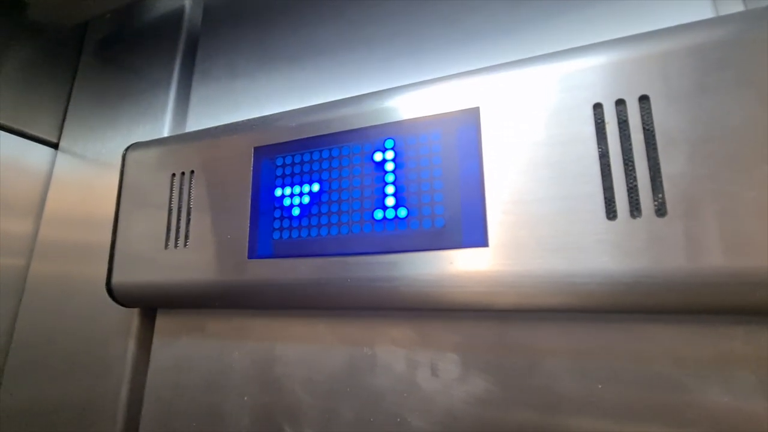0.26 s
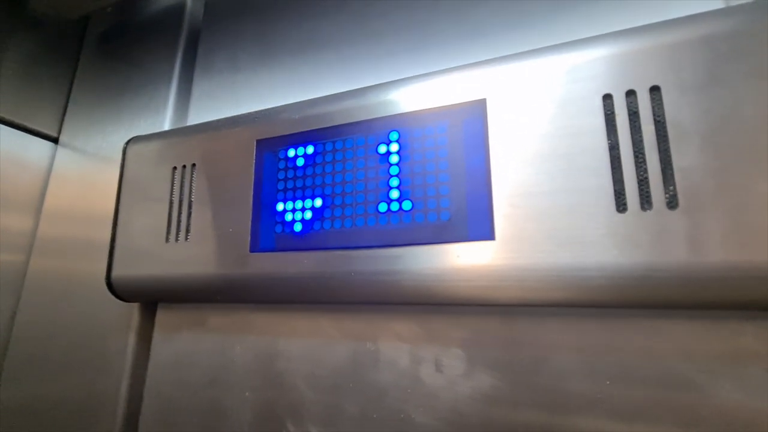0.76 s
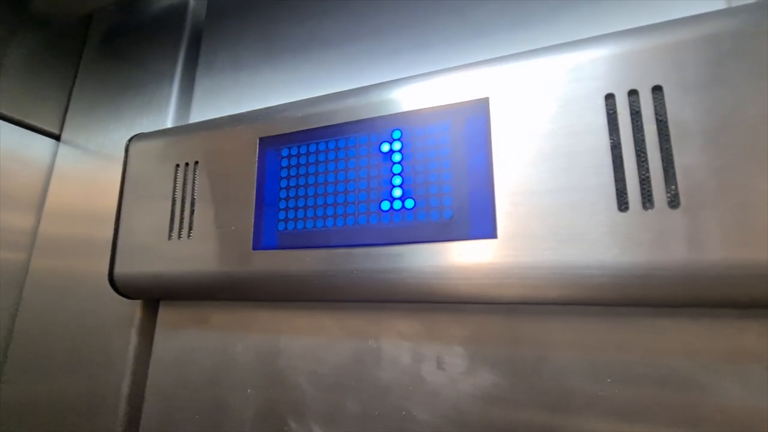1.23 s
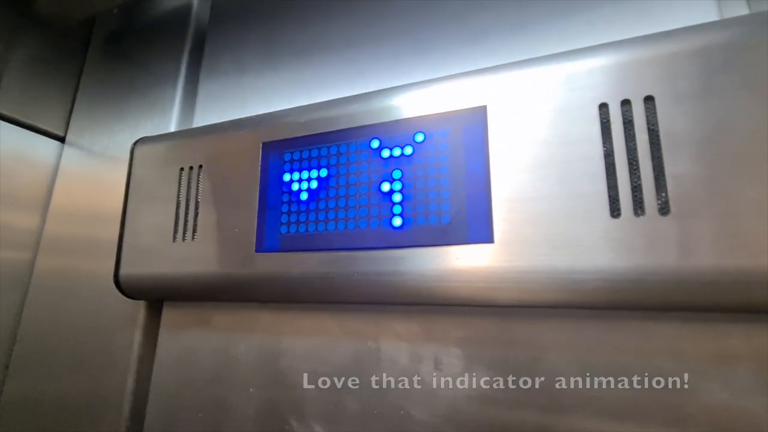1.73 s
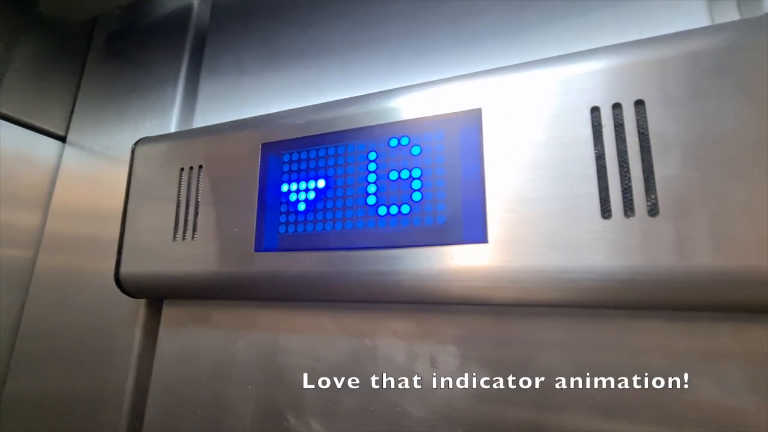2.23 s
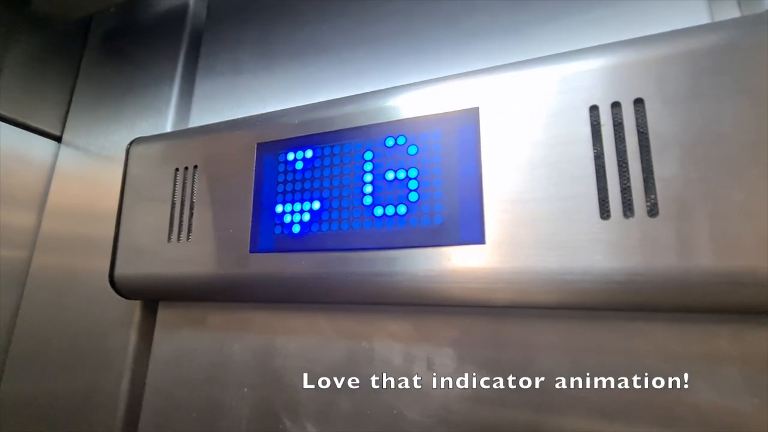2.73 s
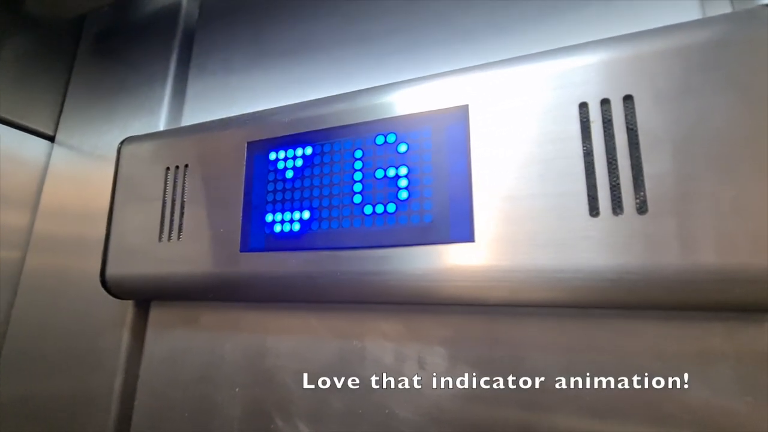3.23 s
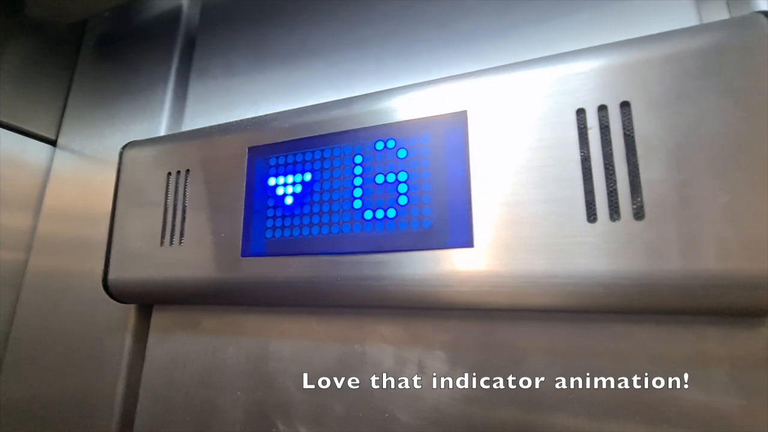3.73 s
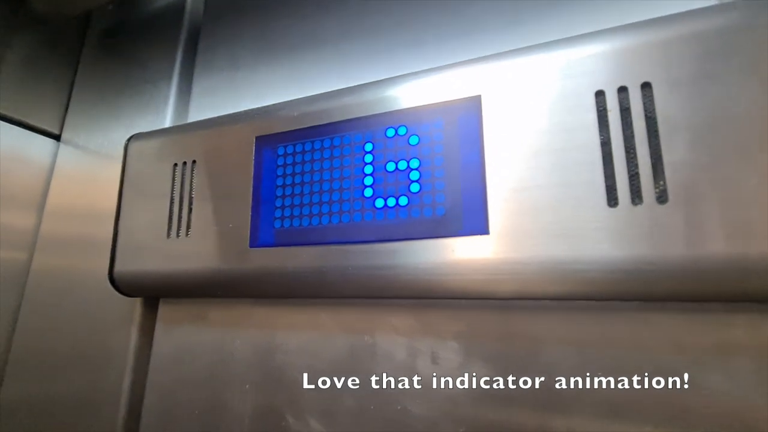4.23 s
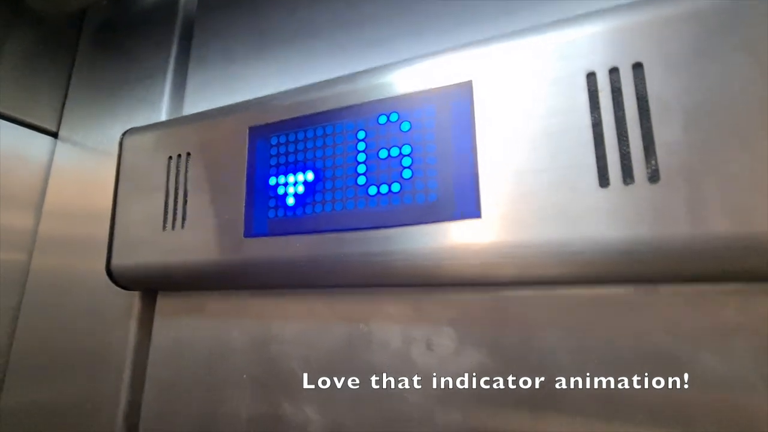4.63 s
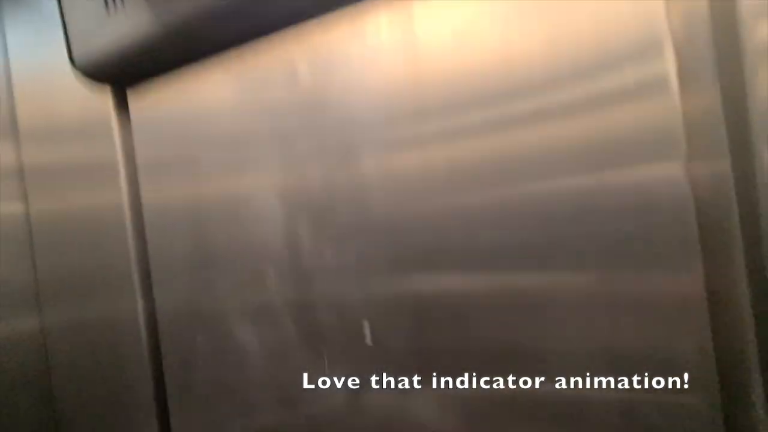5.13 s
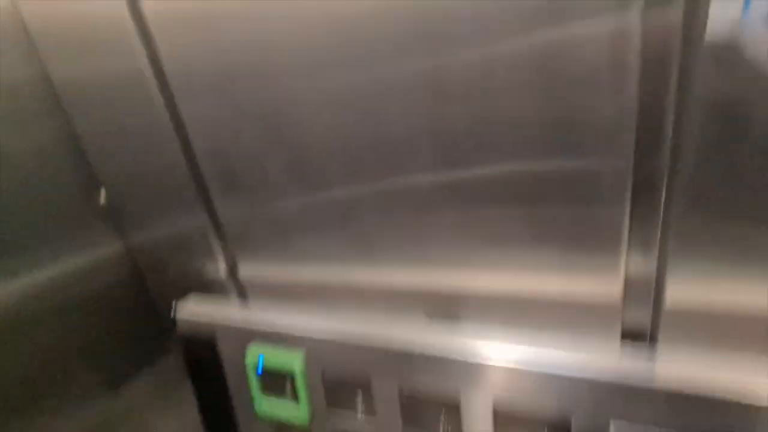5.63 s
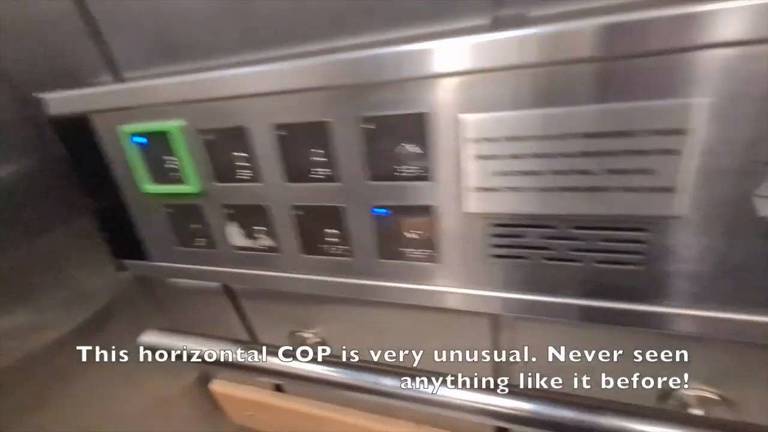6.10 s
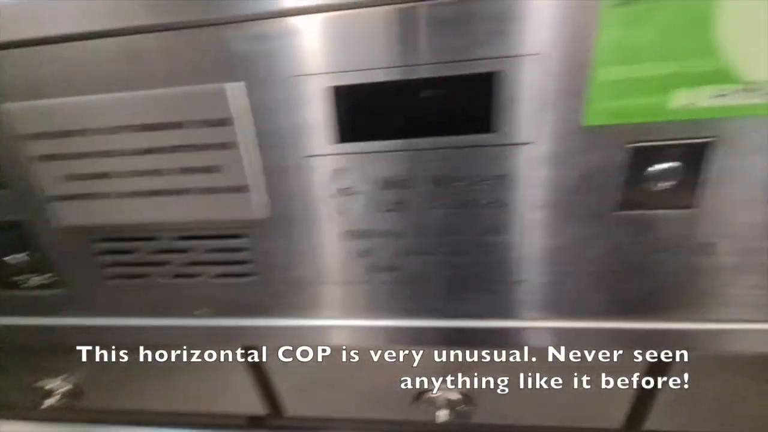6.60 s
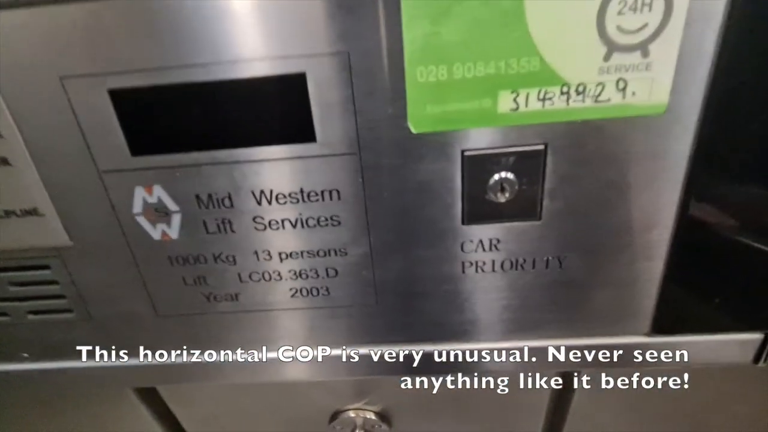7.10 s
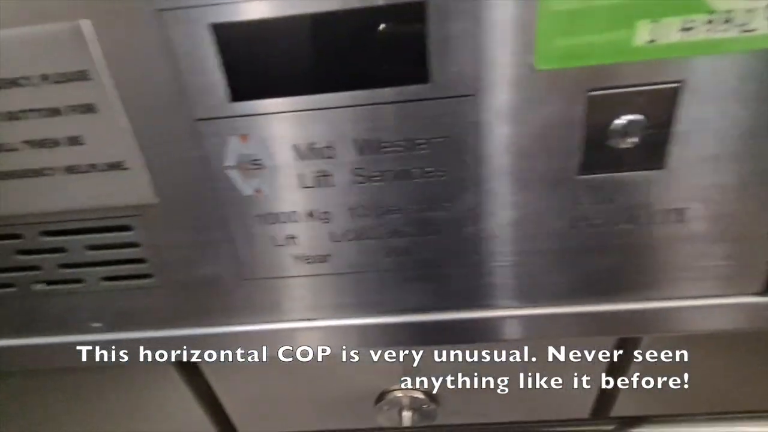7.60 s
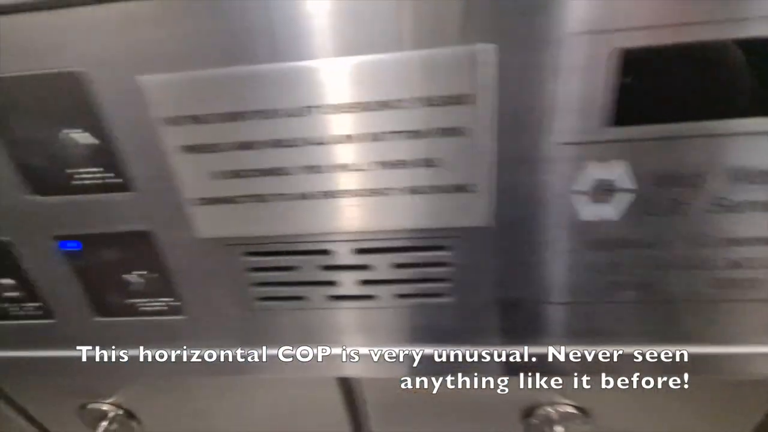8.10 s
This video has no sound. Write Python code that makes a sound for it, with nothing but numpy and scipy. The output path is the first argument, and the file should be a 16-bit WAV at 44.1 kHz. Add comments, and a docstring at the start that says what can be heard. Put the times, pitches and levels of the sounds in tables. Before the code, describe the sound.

Inside a small steel lift going down, a low boomy hum and dull rumble with hollow knocks, small ticks, and later a burst of cloth rustle.

```python
"""Inside a steel lift car going down: noise shaped by the car's air modes makes a dull rumble,
and a narrow low hum with swelling sine waves makes the boom. Guide shoes and panels knock as
rattling noise that rings the small box; fittings tick as short bursts of filtered noise.
Wavering near sines squeal and moan, and cloth rustles as hiss close to a two-port
microphone as the rider turns."""
import sys
import numpy as np
from scipy import signal
from scipy.fft import rfft, irfft
from scipy.io import wavfile
from scipy.ndimage import uniform_filter1d

SR = 44100
rng = np.random.default_rng(int(sys.argv[2]) if len(sys.argv) > 2 else 0)


def store_wav(level_fs):
    """Save 16-bit WAV to argv[1]."""
    pcm = np.round(np.clip(np.atleast_2d(level_fs), -1, 1) * 32767)
    wavfile.write(sys.argv[1], SR, pcm.T.astype(np.int16))


def ratio_of_db(decibels):
    """Turn decibels (scalar or array-like) into linear amplitude factors; 0 dB maps to 1."""
    return 10 ** (np.asarray(decibels, float) / 20)


N = 368215  # length [samples]

# air and panel modes of the car: (pitch [Hz], relative level [dB], time to fall 60 dB [s])
CAR_MODES = [(117, 3, 0.5), (139.6, 0.5, 0.5), (190.9, -4.5, 0.34), (256, 1, 0.36), (315, -1.5, 0.22),
             (369, -2, 0.27), (435, 0.5, 0.18), (495, -9, 0.18), (590, -14, 0.16), (675, -9, 0.15),
             (855, -11, 0.12), (955, -15, 0.12), (1050, -17, 0.09), (1145, -9, 0.09), (1350, -13, 0.08),
             (1505, -20, 0.1), (1650, -20, 0.09), (1845, -16, 0.1), (2070, -20, 0.08), (2340, -24, 0.07),
             (2800, -28, 0.08), (3300, -33, 0.07), (5600, -35, 0.1), (7300, -47, 0.08)]
# how long dense reflections last: (frequency [Hz], time to fall 60 dB [s])
REFLECTION_TIMES = [(100, 0.65), (260, 0.22), (700, 0.29), (1840, 0.13), (4850, 0.18)]
# knocks: (time [s], body [dB], hollow [dB], clack [dB], snap [dB], fizz [dB], rattle time [s])
KNOCK_EVENTS = [(0.004, -32, -33, -41, -57.5, -68.5, 0.0078), (0.427, -33, -33.5, -40.5, -57.5, -66, 0.01),
                (0.595, -44.5, -38, -49.5, -80, -93.5, 0.035),
                (1.065, -34.5, -33.5, -40, -55.5, -66.5, 0.012),
                (1.255, -59, -57, -53.5, -67.5, -81.5, 0.017), (1.533, -49, -54.5, -98, -102, -110, 0.017),
                (1.82, -44.5, -54.5, -78.5, -95, -105, 0.025), (2.0, -48.5, -47, -46, -57.5, -72, 0.04),
                (3.266, -43.5, -52, -52, -84, -105, 0.019), (3.611, -40, -52, -49, -77.5, -105, 0.013),
                (4.135, -35.5, -32, -39.5, -63, -72.5, 0.014), (5.561, -50, -46, -67, -63, -85, 0.027),
                (5.703, -33.5, -41, -40, -65, -77.5, 0.015), (6.098, -32, -31, -33, -50.5, -73.5, 0.0094),
                (6.356, -36, -37.5, -42.5, -66, -73.5, 0.013),
                (6.566, -33.5, -44, -42.5, -72, -89.5, 0.014), (6.702, -37, -37.5, -45, -76, -96, 0.021),
                (7.285, -35.5, -34.5, -39.5, -61, -90.5, 0.018),
                (7.411, -29.5, -34, -56.5, -65.5, -85, 0.016)]
# colour of the reflections of a blow: (frequency [Hz], relative level [dB per Hz])
REFLECTION_COLOUR = [(40, -39), (100, -8.5), (250, -3), (450, -13.5), (1000, -19.5), (1900, -21.5),
                     (3300, -34.5), (4600, -41.5), (7000, -44), (8600, -49.5), (15500, -49)]
# bands of a knock from thud to fizz: (low edge [Hz], high edge [Hz])
THUD_TO_FIZZ = [(100, 200), (200, 400), (400, 800), (900, 4600), (4700, 8000), (8000, 15000)]
# colour of the rumble without the car modes: (frequency [Hz], relative level [dB per Hz])
RUMBLE_COLOUR = [(12, -40), (20, -30), (65, -2), (88, -6), (187, -22.5), (713, -33.5), (916, -43.5),
                 (1690, -43.5), (3500, -61.5), (7230, -66), (8550, -93.5), (11800, -81.5), (15800, -67)]
# steady sounds of the ride: (time [s], rumble [dB], shaft drone [dB], hum [dB])
RIDE_LEVELS = [(0.0, -55, -50, -45.5), (0.7, -54.5, -49, -45), (1.6, -52, -44.5, -36),
               (2.2, -52, -51.5, -41.5), (3.1, -55, -48.5, -39), (3.7, -53.5, -52.5, -44),
               (5.1, -55, -50.5, -45), (6.4, -52, -46.5, -45), (7.05, -51, -53, -53.5),
               (7.35, -46, -48, -55), (7.47, -45, -41, -49), (7.88, -52, -51.5, -53), (8.35, -52, -55, -64)]
# swells of the boom: (peak time [s], peak level [dB], pitch [Hz], length [s])
BOOM_SWELLS = [(0.03, -26.5, 81.6, 0.078), (0.296, -33, 78.8, 0.089), (0.456, -27.5, 80.3, 0.13),
               (0.657, -24.5, 70, 0.21), (0.973, -33, 82.6, 0.23), (1.107, -25.5, 81.6, 0.032),
               (1.378, -34.5, 77.92, 0.21), (1.601, -25, 79.7, 0.08), (1.87, -33, 81.12, 0.18),
               (2.07, -30, 81, 0.16), (2.372, -37.5, 80, 0.2), (2.577, -30.5, 79.8, 0.15),
               (2.895, -32, 83.9, 0.16), (3.47, -34, 83.3, 0.36), (3.825, -32, 82, 0.072),
               (4.174, -29.5, 80.56, 0.15), (4.451, -34.5, 78.7, 0.14), (4.86, -37.5, 80.2, 0.12),
               (5.13, -36, 79.5, 0.27), (5.616, -30, 78, 0.22), (6.12, -38, 78.3, 0.071),
               (6.62, -37.5, 81.66, 0.22), (7.453, -30, 97.5, 0.091), (7.49, -35, 60, 0.04),
               (8.243, -36, 77.2, 0.095)]
# light taps of fittings, and two rows at 2.0 s where the knock rings on: (time [s], level [dB], centre [Hz],
# width [Hz], time to fall 60 dB [s])
TICKS = [(0.296, -54, 915, 800, 0.09), (2.005, -46.5, 2260, 1990, 0.26),
         (2.001, -58, 6440, 600, 0.37), (3.271, -74, 5500, 151, 0.12),
         (3.615, -68, 5500, 150, 0.16), (3.925, -73, 5600, 200, 0.17),
         (4.808, -55, 1660, 1500, 0.17), (5.067, -52, 2180, 700, 0.05),
         (5.139, -50.5, 1330, 900, 0.099), (5.24, -56, 950, 596, 0.99),
         (5.544, -51.5, 1880, 900, 0.11), (6.786, -65.5, 6500, 4000, 0.1),
         (7.105, -52.5, 1200, 1850, 0.2), (7.569, -49, 6870, 2500, 0.043),
         (8.301, -52.5, 6250, 3070, 0.4)]
# thin squeals, one list each: (time [s], pitch [Hz], level [dB])
SQUEAL_CURVES = [
    [(1.86, 7400, -81), (1.96, 7930, -79), (1.985, 7960, -68)],
    [(3.93, 8450, -94), (4.005, 8480, -72), (4.06, 8050, -78), (4.2, 8000, -75), (4.3, 7850, -83),
     (4.38, 7700, -85)],
]
# moans of a panel, one list each: (time [s], pitch [Hz], level [dB])
MOAN_CURVES = [
    [(3.92, 415, -61), (3.95, 440, -57.5), (4.05, 442, -55)],
    [(5.05, 432, -61), (5.134, 427, -56), (5.4, 422, -61)],
]
# colour of rubbing cloth: (frequency [Hz], relative level [dB per Hz])
CLOTH_COLOUR = [(300, -25.5), (600, 2.5), (1400, 2), (2800, 0.5), (5200, -4.5), (6800, 0.5), (7800, -3),
                (8500, -10), (12000, -6), (15800, -6)]
# how strongly the cloth rubs: (time [s], level [dB])
RUB_LEVELS = [(4.35, -87), (4.7, -75.5), (5.45, -65.5), (5.72, -52), (5.81, -55.5), (5.95, -50),
              (6.05, -45.5), (6.16, -47.5), (6.4, -65.5), (6.55, -67.5), (6.9, -80), (7.07, -82.5),
              (7.25, -73), (7.51, -75), (7.9, -65), (8.35, -60)]
# the last rub is fuller in the middle: (time [s], lift [dB])
FULL_RUB_LIFT = [(7.6, -0.5), (8.08, 5.5), (8.3, 3)]
# likeness of the two microphone ports: (frequency [Hz], likeness [0 to 1])
PORT_LIKENESS = [(60, 0.92), (150, 0.99), (380, 0.73), (950, 0.034), (5980, 0.046), (15000, 0.01)]
# level of the left port over the right: (frequency [Hz], difference [dB])
PORT_LEAN = [(60, -1), (180, -1.5), (550, -2), (1650, -4.5), (4970, -4.5), (15000, -6.5)]


def read(points, hz):
    """Reads a table at any frequency, in straight lines over log frequency."""
    f, value = np.transpose(points)
    return np.interp(np.log(hz + 1), np.log(f + 1), value)


def along(rows, t):
    """Reads every column of a time table at times t."""
    s, *columns = np.transpose(rows)
    return [np.interp(t, s, column) for column in columns]


def band_norm(db, hz, lo_hz, hi_hz):
    """Shifts a spectrum so that noise with it has unit power between two frequencies."""
    inside = (hz >= lo_hz) & (hz < hi_hz)
    return db - 10 * np.log10(np.sum(ratio_of_db(db[inside]) ** 2) / len(hz))


def grid(length, size):
    """Frequencies [Hz] and frame times [s] of short overlapping spectra."""
    return np.fft.rfftfreq(size, 1 / SR), np.arange(4 * length // size + 5) * size / 4 / SR


def likeness(hz):
    """How alike the two ports hear a frequency: sound waves that are long reach both alike."""
    return np.clip(read(PORT_LIKENESS, hz), -1, 1)


def noise(field_db, length):
    """Two-port noise shaped over frequency and time, alike in the bass."""
    bins, frames = field_db.shape
    size = 2 * (bins - 1)
    a, b, c, d = rng.standard_normal((frames, bins, 4)).T
    same = likeness(grid(length, size)[0])[:, None]
    left = a + 1j * b
    right = same * left + np.sqrt(1 - same ** 2) * (c + 1j * d)
    unit = 2 * np.sqrt(3 / 4 / size)  # brings the noise to unit power at 0 dB
    spectra = unit * np.array([left, right]) * ratio_of_db(field_db)
    return signal.istft(spectra, nperseg=size, noverlap=3 * size // 4)[1][:, :length]


def patches(shape, bins, frames):
    """Random blobs of unit spread, smoothed over frequency and time."""
    p = rng.standard_normal(shape[::-1]).T
    p = uniform_filter1d(uniform_filter1d(p, size=bins, axis=0), size=frames, axis=1)
    return p / p.std()


def car_modes_db(hz, depth_db, widen):
    """Steady noise is lifted near each mode of the car; a shorter ring makes a wider peak."""
    lift = 0
    for mode_hz, _, t60 in CAR_MODES:
        lift = lift + 1 / (1 + (2 * (hz - mode_hz) * t60 / (3.33 * widen)) ** 2)
    return 10 * np.log10(1 + ratio_of_db(depth_db) ** 2 * lift)


def add(mix, s, sound):
    """Lays a sound into the mix at time s."""
    part = mix[:, round(s * SR):][:, :sound.shape[1]]
    part += sound[:, :part.shape[1]]


def rumble():
    """Rollers and ropes shake the car; air modes colour the noise, the shaft adds a deep drone."""
    hz, t = grid(N, size=2048)
    level_db, drone_db = along(RIDE_LEVELS, t)[:2]
    colour = read(RUMBLE_COLOUR, hz) + car_modes_db(hz, depth_db=7.0, widen=0.76)
    colour = band_norm(colour, hz, lo_hz=150, hi_hz=700)
    deep = -20 * np.log10(1 + (19 / (hz + 1)) ** 4) - 3 * np.log2(hz + 1)
    deep = band_norm(deep, hz, lo_hz=20, hi_hz=60)
    share = np.clip((hz - 60) / 40, 0, 1)[:, None]  # the drone gives way to the rumble
    field = share * (colour[:, None] + level_db) + (1 - share) * (deep[:, None] + drone_db)
    field += 1.57 * patches(field.shape, bins=12, frames=8)
    field += 1.5 * patches(field.shape, bins=60, frames=30)
    return noise(field, N)


def boom():
    """The lowest air mode hums on random shaking and swells when the car is jolted."""
    hum_hz, hum_width_hz = 80.5, 9
    rise_share, edge_db = 0.41, -13  # part of the length spent rising; both ends against the peak
    t = np.arange(N) / SR
    r = np.exp(-np.pi * hum_width_hz / SR)
    shake = rng.standard_normal(N) + 1j * rng.standard_normal(N)
    slow = signal.lfilter([1], [1, -2 * r, r * r], shake)
    hum = (slow * np.exp(2j * np.pi * hum_hz * t)).real
    out = ratio_of_db(along(RIDE_LEVELS, t)[2]) * hum / hum.std()
    for s, db, hz, length in BOOM_SWELLS:
        near = slice(max(round((s - 2 * length) * SR), 0), round((s + 4 * length) * SR))
        u = (t[near] - s) / length
        away = np.where(u < 0, (u / rise_share) ** 2, u / (1 - rise_share))
        wave = np.sin(2 * np.pi * (hz * t[near] + rng.random()))
        out[near] += np.sqrt(2) * ratio_of_db(db + edge_db * away) * wave
    return out


def rattling_blow(t, rattle_s):
    """Loose parts chatter unevenly after a stronger first contact that fades four times as fast."""
    strike_db = 10  # first contact over the rattle
    bounces = ratio_of_db(4.33 * patches((1, len(t)), bins=1, frames=90)[0])
    fade = np.exp(-t / rattle_s) + ratio_of_db(strike_db) * np.exp(-4 * t / rattle_s)
    return rng.standard_normal(len(t)) * bounces * fade


def mode_ring(t):
    """Each mode of the car builds up over a few cycles, then dies as a fading sine at both ports."""
    swell_cycles, pitch_scatter, scatter_db = 2.16, 0.015, 2.5  # each blow lands elsewhere
    ring = np.zeros((2, len(t)))
    for k, (hz, db, t60) in enumerate(CAR_MODES):
        louder, higher = rng.standard_normal(2)
        level = ratio_of_db(db + scatter_db * louder - 60 * t / t60) * (1 - np.exp(-t * hz / swell_cycles))
        phase = 2 * np.pi * hz * (1 + pitch_scatter * higher) * t
        turn = np.arccos(likeness(hz)) / 2 * (-1) ** k  # the ports hear each mode a little apart
        ring += level * np.sin([phase + turn, phase - turn])
    return ring


def reflections(length, rattle_s):
    """Dense echoes fill the car: low ones stay level while it rattles, then each band dies."""
    hold_rattles, hold_hz = 1.5, 3000  # hold in rattle times; halved at hold_hz, shorter above
    hz, frame = grid(length, size=256)
    held = np.maximum(frame - hold_rattles * rattle_s / (1 + hz[:, None] / hold_hz), 0)
    uneven_db = 3 * patches((len(hz), len(frame)), bins=2, frames=12)
    uneven_db += 2 * patches((1, len(frame)), bins=1, frames=3)
    fall_db = 60 * held / read(REFLECTION_TIMES, hz)[:, None]
    return noise(uneven_db + read(REFLECTION_COLOUR, hz)[:, None] - fall_db, length)


def set_bands(sound, band_db):
    """Filters a blow so that each band has its level over the first 50 ms."""
    length = sound.shape[1]
    f = np.fft.rfftfreq(2 * length, 1 / SR)
    power = abs(rfft(sound.mean(0)[:length // 10], 2 * length)) ** 2 * 10 / length ** 2
    points = []
    for (lo, hi), db in zip(THUD_TO_FIZZ, band_db):
        lift_db = db - 10 * np.log10(power[(f > lo) & (f < hi)].sum())
        points += [(1.59 * lo, lift_db), (hi / 1.58, lift_db)]
    colour_db = read(sorted(points), f)
    colour_db -= 20 * np.log10(1 + (80 / (f + 5)) ** 4)  # a blow holds little deep bass
    circle = np.log(ratio_of_db(np.r_[colour_db, colour_db[-2:0:-1]]))
    causal = np.exp(circle - 1j * signal.hilbert(circle).imag)[:len(f)]  # no sound before the blow
    return irfft(rfft(sound, 2 * length) * causal)[:, :length]


def knock(body_db, hollow_db, clack_db, snap_db, fizz_db, rattle_s):
    """A rattling blow rings the modes of the car and fills it with reflections."""
    length = SR // 2
    t = np.arange(length) / SR
    blow = rattling_blow(t, rattle_s)
    rung = signal.fftconvolve(blow[None], mode_ring(t), axes=1)[:, :length]
    dense = reflections(length, rattle_s)
    sound = rung / rung.std() + ratio_of_db(-5.5) * dense / dense.std()
    sound *= 1 - np.exp(-t / (0.059 * rattle_s))  # a longer rattle starts more softly
    # the thud gains on the hollow band when the clack is weaker
    thud_db = hollow_db - 4 + 0.43 * (hollow_db - clack_db)
    return set_bands(sound, [thud_db, body_db, hollow_db, clack_db, snap_db, fizz_db])


def tick(db, centre_hz, width_hz, t60):
    """A short burst with one resonance, narrow or broad, and a tail."""
    length = SR // 4
    hz, frame = grid(length, size=256)
    shape = -20 * np.log10(1 + (2 * (hz - centre_hz) / width_hz) ** 2)
    shape = band_norm(shape, hz, lo_hz=0, hi_hz=SR)
    sound = noise(db + shape[:, None] + 0 * frame, length)
    t = np.arange(length) / SR
    return sound * ratio_of_db(-60 * t / t60) * (1 - np.exp(-t * width_hz))


def tone(rows, waver, flutter_db):
    """A near sine on a pitch and a level curve; smoothed noise unsettles both."""
    t = np.arange(N) / SR
    pitch_hz, level_db = along(rows, t)
    hz = uniform_filter1d(pitch_hz, size=1500)
    hz *= 1 + waver * uniform_filter1d(rng.standard_normal(N), size=2000)
    level_db = level_db + flutter_db * patches((1, N), bins=1, frames=900)[0]
    start, end = rows[0][0] - 0.035, rows[-1][0] + 0.024
    fade = np.clip(np.minimum(t - start, end - t) / 0.027, 0, 1)
    return np.sqrt(2) * ratio_of_db(level_db) * fade * np.sin(2 * np.pi * np.cumsum(hz) / SR)


def squeal(rows):
    """A thin, high near sine with a slight waver."""
    return tone(rows, waver=0.15, flutter_db=4)


def moan(rows):
    """A panel moans as a lower near sine that wavers more."""
    return tone(rows, waver=1.2, flutter_db=5)


def rustle():
    """Cloth slides over cloth: smooth hiss with soft patches and brief scuffs."""
    firm_db, dull_per_db = -54.5, 0.4345  # a lighter rub than firm_db is duller
    rasp_hz, rasp_width_hz, rasp_per_db = 2070, 160, 0.75  # a firmer one rasps in one band
    full_hz, full_octaves = 2400, 1
    hz, t = grid(N, size=256)
    level_db = along(RUB_LEVELS, t)[0]
    shape = band_norm(read(CLOTH_COLOUR, hz), hz, lo_hz=4000, hi_hz=15000)
    shape[hz < 400] -= 40
    hz = hz[:, None]
    low = np.clip(np.log2(4500 / (hz + 1)), 0, 1)  # part of the sound below the hiss
    field = shape[:, None] + level_db + low * dull_per_db * (firm_db - level_db)
    rasp_db = rasp_per_db * np.maximum(level_db - firm_db, 0)
    field += rasp_db / (1 + (2 * (hz - rasp_hz) / rasp_width_hz) ** 2)
    middle = np.exp(-(np.log2((hz + 1) / full_hz) / full_octaves) ** 2)
    field += along(FULL_RUB_LIFT, t)[0] * middle
    scuffs = patches((1, len(t)), bins=1, frames=6)
    field += 1.1 * patches(field.shape, bins=4, frames=16) + (0.7 + 1.2 * low) * scuffs
    return noise(field, N)


def scene():
    """Boom, rumble, knocks, ticks, faint tones and rustle together."""
    mix = rumble() + boom() + rustle()
    for s, *blow in KNOCK_EVENTS:
        add(mix, s, knock(*blow))
    for s, *tap in TICKS:
        add(mix, s, tick(*tap))
    for rows in SQUEAL_CURVES:
        mix[0] += squeal(rows)  # left port only
    for rows in MOAN_CURVES:
        mix += moan(rows)
    return mix


def band_limit(x):
    """A steep low-pass at the top of the band."""
    return signal.sosfilt(signal.butter(12, 16290, fs=SR, output="sos"), x)


def record(dry):
    """The two microphone ports differ in level, most in the treble; the top is cut off."""
    hz = np.fft.rfftfreq(N, 1 / SR)
    lean_db = read(PORT_LEAN, hz) / 2  # half up on the left, half down on the right
    passed = hz < 15800
    finished = irfft(rfft(dry) * ratio_of_db([lean_db, -lean_db]) * passed, N)
    return band_limit(finished)


dry = scene()
out = record(dry)
store_wav(out)
```